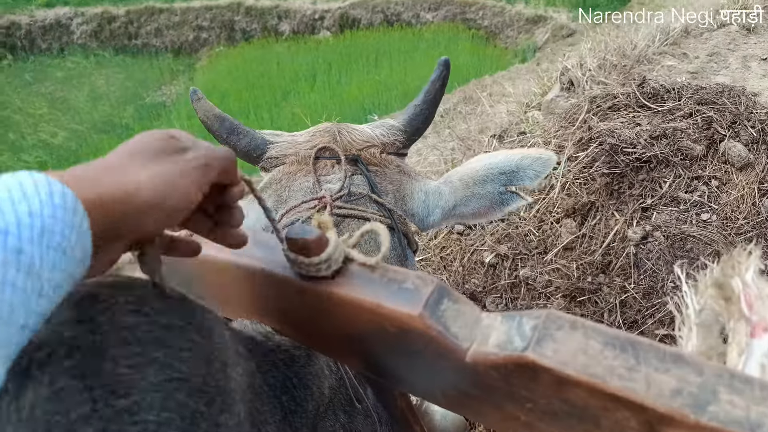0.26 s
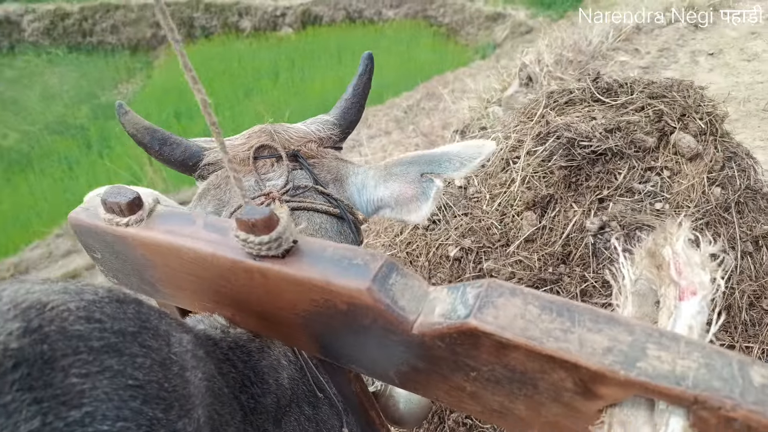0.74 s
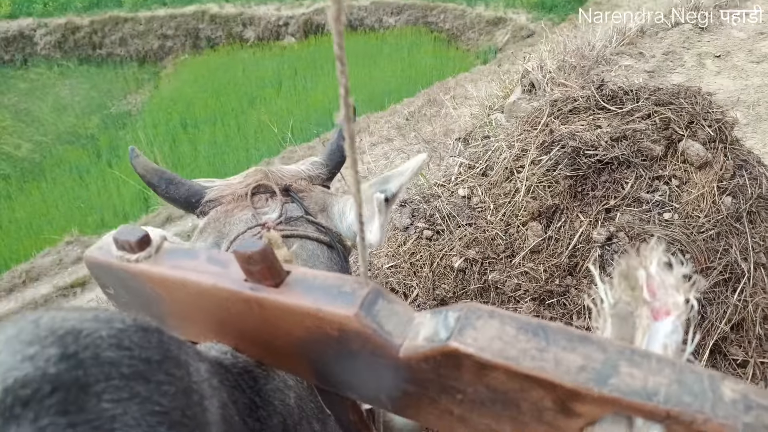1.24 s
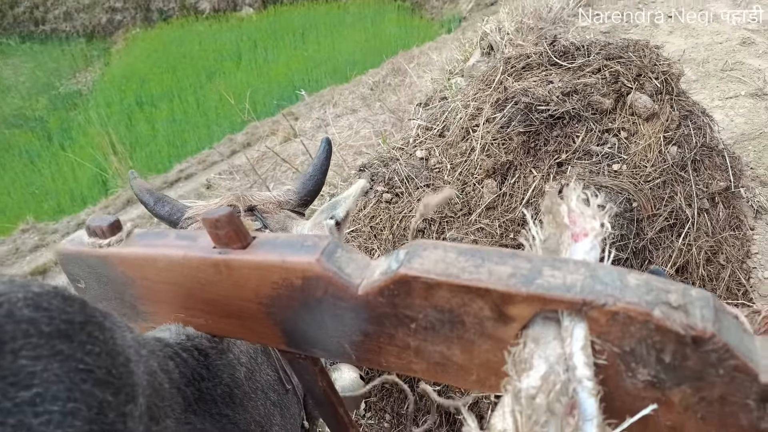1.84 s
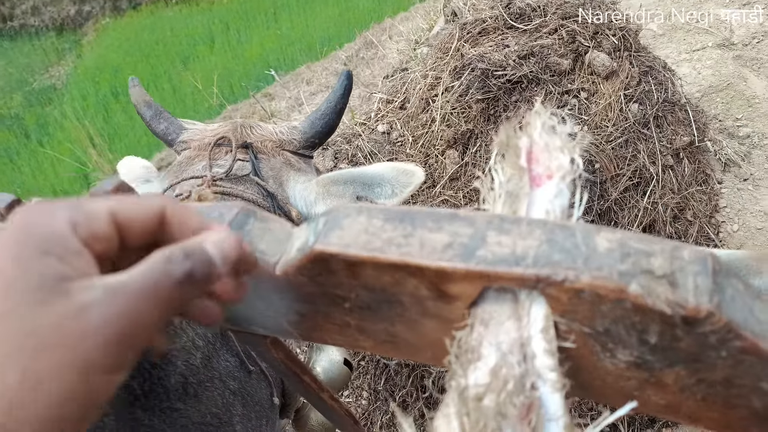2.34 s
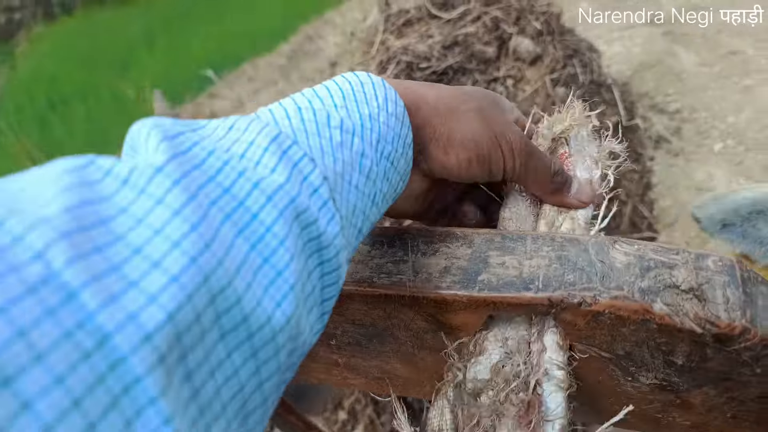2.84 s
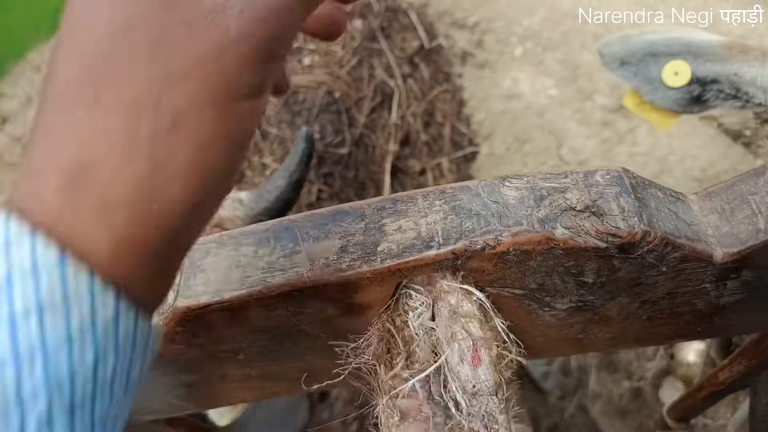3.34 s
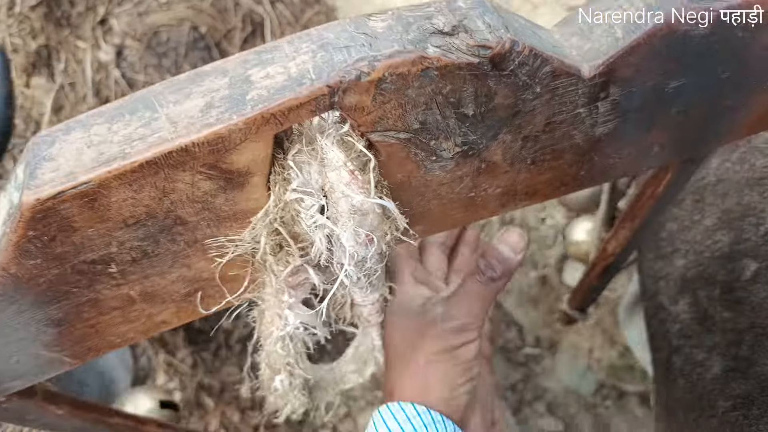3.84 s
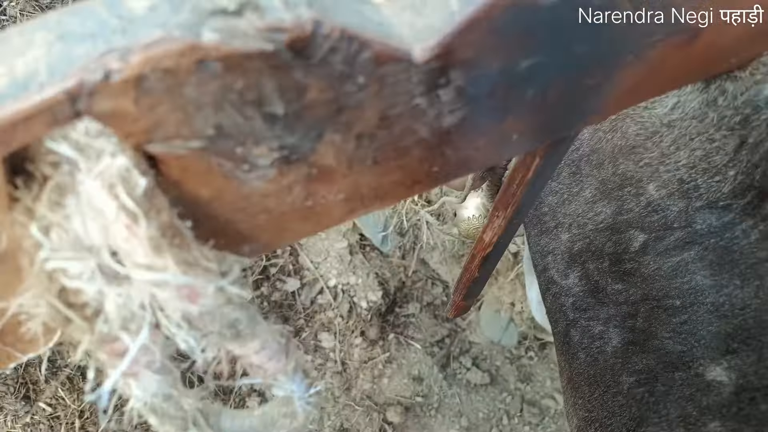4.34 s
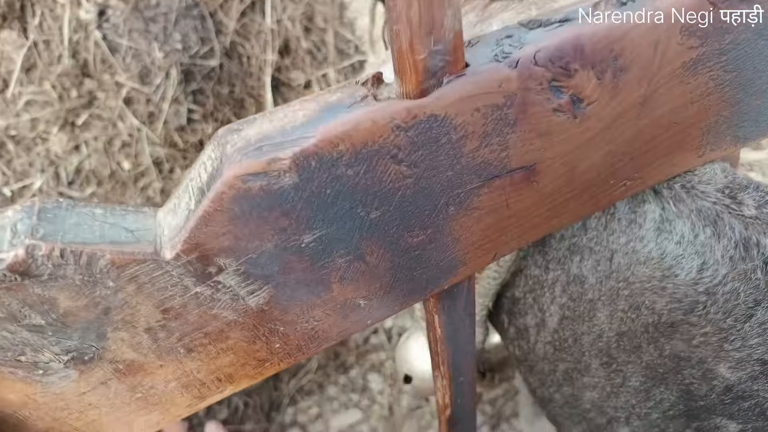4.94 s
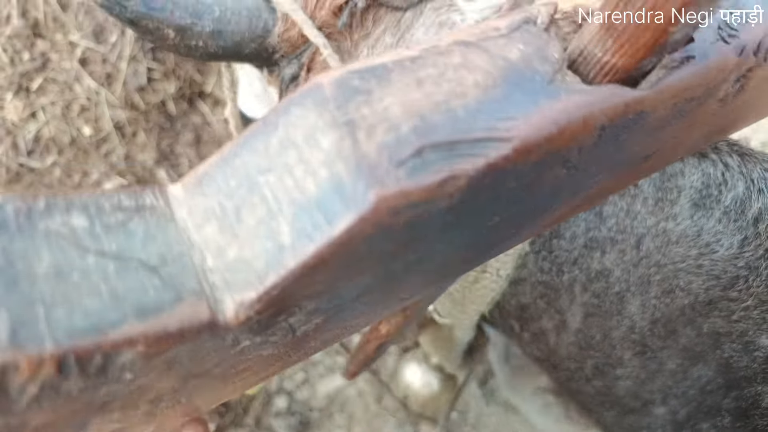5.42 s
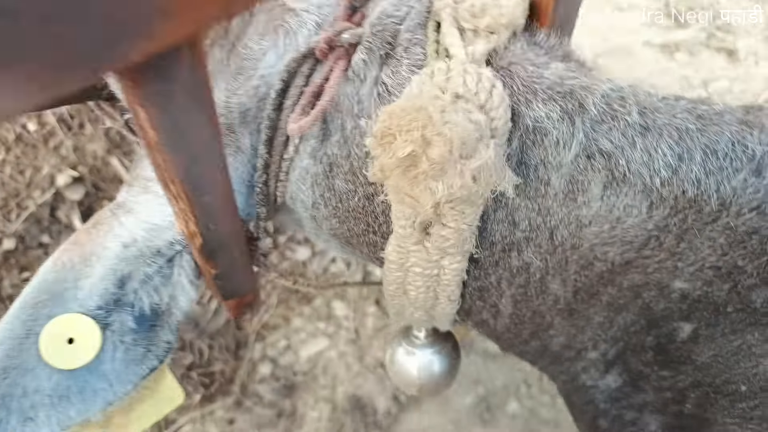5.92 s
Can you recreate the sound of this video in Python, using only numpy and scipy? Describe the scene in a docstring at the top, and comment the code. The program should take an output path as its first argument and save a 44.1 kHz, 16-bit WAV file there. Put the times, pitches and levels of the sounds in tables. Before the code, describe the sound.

Small metal neck bells clink and ring on yoked cattle as a wooden peg knocks in its beam, building to a loud jangle.

```python
"""Three open neck bells ring as their clappers land, each a sum of decaying modes excited by impulses.
Two round pellet bells clink and at last jangle: a slit's air note, shell modes and a short noise clash.
Two yoked cattle stand in a field while the yoke is worked loose close to the microphone: a peg knocks in
the beam (short wooden modes and a crack), and rope and straw rustle (grainy filtered noise).
Small gusts puff on the microphone as brief low cycles with eddies, over a faint open-air hush."""
import sys
import numpy as np
from scipy import signal
from scipy.fft import rfft, irfft, next_fast_len
from scipy.io import wavfile
from scipy.ndimage import uniform_filter1d

SR = 44100
rng = np.random.default_rng(int(sys.argv[2]) if len(sys.argv) > 2 else 0)


def pcm_store(signal):
    """Save signal as 16-bit PCM."""
    levels = np.round(np.clip(np.atleast_2d(signal), -1, 1) * 32767)
    wavfile.write(sys.argv[1], SR, levels.astype(np.int16).T)


N = 272405

# Levels in the tables are relative, before the gains and random spreads of their sources.
# open-air hush: (frequency [Hz], spectrum [dB per Hz])
FIELD_COLOUR = [(30, -5), (120, 7), (400, 4.5), (1130, -32), (4080, -7), (8080, -74), (12000, -30),
                (16000, -6)]
FIELD_DB = -80.5
# gusts on the microphone: (time [s], level [dB], pitch [Hz])
PUFFS = [(0.06, -31.5, 129), (0.18, -37, 145), (1.025, -37.5, 184), (1.186, -32, 110), (1.24, -42, 160),
         (1.373, -43, 121), (1.785, -41.5, 150), (1.859, -39.5, 103), (1.899, -43, 125.3),
         (1.969, -30.5, 132), (2.16, -57, 90), (2.798, -53, 112), (3.048, -36, 120), (4.081, -32.5, 140),
         (4.386, -42.5, 127), (4.821, -56.5, 85), (6.15, -46, 140)]
# spells of fluttering air around the puffs: (start [s], end [s], level [dB])
FLUTTER = [(1.0, 1.46, -61.5), (1.616, 1.95, -57.5), (3.003, 3.175, -62.5), (3.646, 3.95, -72.5),
           (4.146, 4.454, -61.5), (5.05, 5.15, -60.5)]
# straw, hide and cloth: (time [s], level [dB])
RUSTLE = [(0, -69), (.25, -80.5), (.47, -80), (.5, -85.5), (.98, -82.5), (1.05, -69.5), (1.6, -75.5),
          (2.0, -77), (2.5, -79), (2.9, -68.5), (3.22, -68), (3.3, -76), (3.6, -74.5), (4.1, -70.5),
          (4.38, -70.5), (4.56, -79.5), (5.1, -67.5), (6.18, -64)]
# spectrum of the rustle and of the contact noises: (frequency [Hz], spectrum [dB per Hz])
RUSTLE_COLOUR = [(60, -29.5), (250, -20), (550, -20.5), (990, -17), (1680, -23), (2130, -21), (4950, -23),
                 (6050, -24.5), (8000, -33.5), (9580, -47), (13100, -45), (15100, -37), (16000, -36)]
# a hand or strap brushes past: (time [s], level [dB])
SCUFFS = [(2.14, -67)]
# the rope drags round the peg: (time [s], level [dB])
ROPE = [(.6, -100), (.635, -65.5), (.66, -69), (.675, -53.5), (0.716, -48.5), (.75, -59.5), (.8, -66.5),
        (.86, -112)]
# spectrum of the rope: (frequency [Hz], spectrum [dB per Hz])
ROPE_COLOUR = [(40, -40), (130, -5.5), (410, -2), (700, -9.5), (1200, -11.5), (1670, -2), (2300, -10.5),
               (4100, -9), (6300, -12.5), (9000, -27), (15500, -22)]
# modes of the wooden beam: (frequency [Hz], level [dB], t60 [s])
WOOD_MODES = [(168, -30, 0.11), (478, -18, 0.072), (617, -11.5, 0.008), (804, -17.5, 0.066),
              (1008, -6.5, 0.086), (1517, -1, 0.018), (1754, -4, 0.055), (2163, -2.5, 0.029),
              (2584, 0.5, 0.018), (2970, -2.5, 0.038), (4170, -2, 0.017)]
# peg and beam knocks: (time [s], level [dB], place on the beam [0-1], hardness [dB per octave])
KNOCKS = [(1.0124, -37.5, 0.26, 3.5), (1.072, -29.5, 0.08, -9), (1.082, -40.5, 0.3, -9),
          (1.131, -39.5, 0.46, -2.5), (1.1437, -30.5, 0.39, -1.5), (1.221, -45.5, 0, -5.5),
          (1.279, -47, 0.55, -5.5), (1.848, -35, 0.52, -5), (2.962, -48, 0.26, -2),
          (3.024, -42.5, 0.35, -9.5), (4.371, -49, 0.34, -0.5), (4.581, -30, 0.58, -3),
          (5.160, -47, 0.34, -11.5), (5.368, -45.5, 0.76, -10), (5.558, -42, 0.82, -12.5)]
# air notes of the two slits: (frequency [Hz], t60 [s])
SLIT_NOTES = [(1040, 0.18), (1105, 0.17)]
# mode frequencies of the two round shells: (frequency [Hz])
SHELL_A_HZ = [2511, 3110, 4648, 4832, 5399, 5566, 6940, 7485, 10500, 15715, 2638]
SHELL_B_HZ = [2738, 2955, 4938, 5050, 5680, 6374, 7970, 11220, 14760, 15320, 5313]
# shells of the two round bells, three parallel lists: (frequency [Hz], level [dB], t60 [s])
SHELL_A = (SHELL_A_HZ, [-15.5, -11.5, -4, -7.5, -7.5, -11, -16, -17, -25.5, -19, -12.5], [0.22, 0.12, 0.17,
           0.15, 0.21, .15, 0.19, 0.2, 0.14, .2, 0.094])
SHELL_B = (SHELL_B_HZ, [-8, -13.5, -11, -4, -15.5, -12.5, -18, -27.5, -24, -24, -11], [.15, 0.12, 0.12,
           0.14, 0.17, 0.13, 0.12, 0.14, 0.15, .15, .15])
# pellet blows; low pitch = first bell, high = second:
# (time [s], level [dB], pitch [Hz], shell against air note [dB])
CLINKS = [(0.383, -50.5, 1124, -12), (1.2394, -41, 1112, -20), (1.335, -41, 1106, -9),
          (1.3869, -34.5, 1122, -18), (1.434, -39.5, 1117, -12), (1.88, -30.5, 1112, -6.5),
          (1.9634, -42, 1110, 3), (2.239, -40, 1110, -4.5), (2.2702, -33.5, 1085, -11),
          (2.35, -39, 1084, -6), (2.389, -34.5, 1060, -10), (2.416, -37, 1075, -8), (2.458, -41, 1096, -6),
          (2.605, -42, 1086, -6), (2.656, -31, 1054, -3.5), (2.7047, -33, 1120, -6.5),
          (2.727, -35, 1110, -9), (2.7824, -34, 1114, -8), (2.843, -37, 1090, -13),
          (2.862, -40.5, 1053, -7), (3.0299, -32, 1022, -23), (3.345, -44.5, 1020, -16),
          (4.4085, -37.5, 1170, -8), (4.5077, -29.5, 1084, -3), (4.6239, -29.5, 1103, -11.5),
          (4.669, -37.5, 1030, -15), (4.7565, -29.5, 1061, -8), (4.9033, -35, 1035, -21),
          (5.072, -37, 1027, -20), (5.1464, -40, 1100, -17), (5.2024, -20.5, 1112, -9),
          (5.24, -34, 1150, 5), (5.297, -27.5, 1042, -8.5), (5.322, -32.5, 1050, -12),
          (5.3607, -27.5, 1035, -12.5), (5.392, -33.5, 1030, -3.5), (5.5148, -27.5, 1055, -10),
          (5.6154, -23.5, 1107, -29.5), (5.706, -28, 1128, -23), (5.72, -25.5, 1036, -24),
          (5.7617, -21.5, 1076, -2.5), (5.7872, -19, 1045, -20), (5.8192, -19.5, 1037, -20),
          (5.865, -30, 1035, 2), (5.9, -20.5, 1095, -15), (5.936, -12.5, 1118, -13.5),
          (5.9715, -6.5, 1120, -6), (5.985, -9.5, 1100, -8.5), (6.041, -16.5, 1104, 0.5),
          (6.085, -14, 1037, 2), (6.092, -3.5, 1107, -18), (6.104, -9, 1110, -8.5), (6.122, -7, 1133, -10),
          (6.147, -11.5, 1033, -5)]
# pellets rolling and bouncing while the necks swing: (time [s], level [dB])
JANGLE = [(1.82, -90), (1.835, -62.5), (1.885, -62.5), (1.91, -93), (4.4, -92), (4.75, -76), (5.68, -60),
          (5.8, -46), (6.03, -37), (6.18, -42)]
# mode frequencies of the three open bells: (frequency [Hz])
LOW_HZ = [802, 2048, 3771, 3701, 5420, 5845, 6733, 6453, 8435, 6650, 6519, 5380, 10780, 799, 15097, 15697]
THIN_HZ = [6737, 3630, 4660, 2057, 6062, 5595, 6277, 7960, 6358, 4885, 4770, 10120, 11070, 14340, 10720,
           5009]
CLEAR_HZ = [2044, 4322, 804, 5688, 6762, 6054, 7580, 5962, 10145, 4302, 7693, 14750, 15510, 3665]
# open bells, three parallel lists: (frequency [Hz], level [dB], t60 [s]);
# neighbouring modes swing along two different axes of the bell
LOW_BELL = (LOW_HZ, [-10, -9.5, -6.5, -12.5, -4.5, -6, -12.5, 0.5, -14, -9, -7, -11, -23, -12, -15, -20],
            [1.68, 1.23, 1.14, 1.6, 0.72, .45, 1.08, 0.25, 0.42, .5, 0.29, 0.54, 0.24, 1.66, 0.24, .2])
THIN_BELL = (THIN_HZ, [-21, -8.5, -11, -15, 2, -13, -5, -7.5, -5.5, -2.5, -14, -14.5, -18.5, -5, -23, -6],
             [0.9, 0.36, .1, 0.85, 0.12, 0.28, 0.31, 0.21, 0.14, 0.17, 0.1, 0.19, 0.11, 0.17, 0.12, 0.13])
CLEAR_BELL = (CLEAR_HZ, [-15.5, -8, -18, -9, -10, -3, -14, -8, -13, -9, -5.5, -15, -13, -13], [.9, 1.24,
              1.27, 0.33, 0.81, 0.32, 0.29, 0.4, 0.23, 0.96, 0.29, .25, .2, 0.28])
# clapper blows: (bell [name], time [s], level [dB], place on the rim [0-1])
BLOWS = [("low", 1.1338, -45.5, 0.3), ("low", 1.4341, -46, 0.9), ("low", 1.562, -57, 0.6),
         ("low", 3.076, -51, 0.8), ("thin", 1.827, -42.5, 0.32), ("low", 1.8322, -48, 0.58),
         ("low", 1.8547, -49, 0.53), ("thin", 2.234, -41, 0.22), ("thin", 2.2503, -42, 0.48),
         ("low", 2.6, -41.5, 0.34), ("thin", 2.6684, -34.5, 0.67), ("thin", 3.0751, -42, 0.4),
         ("thin", 3.395, -31, 0.27), ("thin", 3.5538, -52, 0.3), ("thin", 4.579, -39.5, 0.36),
         ("clear", 4.702, -33.5, 0.47), ("clear", 4.7364, -31.5, 0.78), ("clear", 4.7671, -30.5, 0.53),
         ("clear", 4.7988, -35.5, 0.33), ("low", 4.9397, -41, 0.24), ("thin", 4.937, -29, 0.28),
         ("clear", 4.9768, -27, 0.2), ("low", 5.228, -36.5, 0.31), ("low", 5.3393, -39, 0.54),
         ("thin", 5.5094, -41, 0.11), ("low", 5.7144, -34, 0.7), ("low", 5.8386, -30, 1),
         ("low", 5.8624, -28.5, 0.65), ("clear", 5.9723, -31.5, 0.17), ("thin", 5.9974, -18.5, 0.4),
         ("clear", 5.999, -22, 0.85)]

SCUFF_RISE_S, SCUFF_FADE_S = 0.0093, 0.049
SWING_S, SWING_DB = 0.06, 3.5  # a swinging bell turns its modes to and from the microphone
# faint stray clinks fall at random within these times and pitches
STRAY_S, STRAY_HZ = (1.0, 5.7), (992, 1170)
STRAY_DB, STRAY_SPREAD_DB, STRAY_SHELL_DB = -55, 3.5, -12
TOP_HZ = 15900
STIR = 1e-15 * np.cos(np.arange(N))  # keeps dying modes from reaching zero


def undb(db):
    """Logarithmic level: 20 dB is a factor of ten in amplitude."""
    return 10 ** (np.asarray(db) / 20)


def curve(rows):
    """Linear interpolation: a (time, value) table joined by straight lines."""
    return np.interp(np.arange(N) / SR, *np.transpose(rows))


def walk(hold_s):
    """Smoothed random process: normal values held for hold_s and slewed."""
    hold = int(hold_s * SR)
    steps = np.repeat(rng.standard_normal(N // hold + 1), hold)
    return uniform_filter1d(steps, hold)[:N]


def butter(sound, hz, kind="low"):
    """Second-order Butterworth filtering: a maximally flat passband."""
    return signal.sosfilt(signal.butter(2, hz, kind, fs=SR, output="sos"), sound)


def coloured(points, lo_hz, hi_hz):
    """Spectral shaping: two unrelated noises of one spectrum, rms 1 between lo_hz and hi_hz."""
    size = next_fast_len(N, True)
    f = np.maximum(np.fft.rfftfreq(size, 1 / SR), 1)
    point_hz, point_db = np.transpose(points)
    gain = undb(np.interp(np.log(f), np.log(point_hz), point_db))
    band = (f > lo_hz) & (f < hi_hz)
    gain = gain / np.sqrt(np.sum(gain[band] ** 2) / len(f))
    return irfft(rfft(rng.standard_normal((2, size))) * gain, size)[:, :N]


def ports(hz):
    """Directional level difference: low modes nearly alike in both ports, higher ones leaning right."""
    lean = np.clip(hz / 7000, .2, 1) * (1 - .6 * (hz > 10000))  # less above 10 kHz
    spread_db = (2.5 + 3 * (hz > 6500)) * rng.standard_normal() * (hz > 1500)
    pan_db = lean * (-1.5 + spread_db)
    return undb([[pan_db / 2], [-pan_db / 2]])


def ring(force, hz, t60, rise_s=0.00089):
    """Damped resonance: a unit tick swings up with time constant rise_s, then fades 60 dB in t60."""
    w = 2 * np.pi * hz / SR
    slow, quick = np.exp(-np.log(1000) / (t60 * SR)), np.exp(-1 / (rise_s * SR))
    fade = [.5, 0, -.5, 1, -2 * slow * np.cos(w), slow ** 2]
    rise = [1 - quick, 0, quick - 1, 1, -2 * quick * np.cos(w), quick ** 2]
    out, first = np.zeros(N), np.argmax(force != 0)
    out[first:] = signal.sosfilt([fade, rise], (force + STIR)[first:])
    return out


def ticks(times, gains, bounce_s, count=3):
    """Repeated impact: each blow is a tick and a few weaker rebounds within bounce_s."""
    late = rng.random((len(times), count)) * bounce_s * SR
    late[:, 0] = 0
    at = (np.asarray(times)[:, None] * SR + late).astype(int).clip(0, N - 1)
    force = np.zeros(N)
    np.add.at(force, at, np.asarray(gains)[:, None] * 0.7 ** np.arange(count))
    return force


def burst(s, db, fade_s, bounce_s, low_hz=1620.0):
    """High modal density: modes too dense to tell apart become a bright noise that dies fast."""
    fade = signal.lfilter([1], [1, -np.exp(-1 / (fade_s * SR))], ticks(s, undb(db), bounce_s))
    return butter(fade * coloured(RUSTLE_COLOUR, 720, 12000)[0], low_hz, "high")


def struck(modes, blows, bounce_s, scatter_db, centre_hz, rise_s, swing_db=0):
    """Modal excitation: the place shares a blow between two axes, the hardness tilts the modes."""
    s, db, place, *hard_db = np.transpose(blows)
    angle = np.pi / 2 * place.clip(0, 1)
    axes = np.cos(angle), np.sin(angle)
    out, swing = np.zeros((2, N)), undb(swing_db * walk(SWING_S))
    for k, (hz, mode_db, t60) in enumerate(modes):
        tilt_db = sum(hard_db) * np.log2(hz / centre_hz) + scatter_db * rng.standard_normal(len(s))
        heard = ports(hz) * np.roll(swing, rng.integers(N))
        force = ticks(s, axes[k % 2] * undb(db + mode_db + tilt_db), bounce_s)
        out += heard * ring(force, hz, t60, rise_s)
    return out


def field_hush():
    """Stationary noise: a steady open-air hush, alike in both ports."""
    return undb(FIELD_DB) * coloured(FIELD_COLOUR, 30, 12000)[0]


def gusts(turns=0.82, eddy_db=-13.0):
    """Pressure on a diaphragm: puffs drive a cycle or two with small eddies, alike in both ports."""
    out, t = np.zeros(N), np.arange(N) / SR
    eddy_colour = [(40, -4), (100, 13.0), (300, 3.5), (1100, -40), (4000, -80)]  # (Hz, dB per Hz)
    eddies = undb(eddy_db) * coloured(eddy_colour, 40, 850)[0]
    for (s, db, hz), phase in zip(PUFFS, rng.random(len(PUFFS))):
        near = slice(max(int((s - .08) * SR), 0), int((s + .08) * SR))
        cycles = (t[near] - s) * hz
        wave = np.exp(-(cycles / turns) ** 2) * np.cos(2 * np.pi * (cycles + phase))
        out[near] += undb(db) * (wave + np.exp(-np.abs(cycles) / (2.36 * turns)) * eddies[near])
    rumble_colour = [(30, -17), (70, -3.5), (120, 1), (200, -13.0), (400, -41), (1500, -90)]
    rumble = coloured(rumble_colour, 30, 400)[0] * undb(4.9 * walk(.025))
    for start, end, db in FLUTTER:
        swell = np.sin(np.pi * ((t - start) / (end - start)).clip(0, 1))
        out += undb(db) * swell * rumble
    return out


def rustle(gain, colour, lo_hz, hi_hz, grain_db, grain_s, patchy_db=4.0, drift_db=2.5):
    """Stick-slip friction: fibres slip in uneven grains, nearly the same in both ports."""
    mid, side = coloured(colour, lo_hz, hi_hz)
    patches = 0
    for edge_hz in (300, 600, 1200, 2500):  # each band from the bass up swells in its own patches
        dull = butter(mid, edge_hz)
        patches = patches + undb(patchy_db * walk(.04)) * dull
        mid = mid - dull
    mid = undb(drift_db * walk(.11)) * mid + patches
    side = undb(-20) * butter(side, 2500, "high")
    return gain * undb(grain_db * walk(grain_s)) * (mid + side * np.array([[1], [-1]]))


def scuffs():
    """Exponential envelope: each brush swells quickly and fades slowly."""
    t = np.arange(N) / SR
    return sum(undb(db) * np.exp(np.minimum((t - s) / SCUFF_RISE_S, (s - t) / SCUFF_FADE_S))
               for s, db in SCUFFS)


def straw():
    """Dry friction: straw, hide and cloth rustle, louder where a hand or strap brushes past."""
    return rustle(undb(curve(RUSTLE)) + scuffs(), RUSTLE_COLOUR, 1004, 2490, 2.5, 0.018)


def rope():
    """Sliding friction: the rope drags round the peg in short, fine grains."""
    return rustle(undb(curve(ROPE)), ROPE_COLOUR, 100, 16000, 3.2, 0.004, 2.0, 0)


def wood(crack_db=-3.5):
    """Impact on a beam: short modes, and a broad crack of the contact itself."""
    s, db, _, hard_db = np.transpose(KNOCKS)

    def crack(on):
        """Contact noise: a harder blow cracks louder."""
        return burst(s[on], (db + 2.1 * hard_db + crack_db)[on], 0.0037, 0.0027, 360.0)

    soft = hard_db < -5
    dull = 2 * butter(crack(soft), 3800)  # a soft contact cracks with little treble
    return struck(WOOD_MODES, KNOCKS, 0.003955, 1.0, 1230.0, 0.00037) + crack(~soft) + dull


def clinks(count=95):
    """Random arrivals: the listed pellet blows joined by faint stray ones, as columns."""
    when, pitch, size, tone = rng.random((count, 4)).T
    stray_db = STRAY_DB + STRAY_SPREAD_DB * np.log(size / (1 - size)) / 2
    stray = [np.interp(when, (0, 1), STRAY_S), stray_db,
             np.interp(pitch, (0, 1), STRAY_HZ), STRAY_SHELL_DB + 12 * (tone - .5)]
    return np.hstack([np.transpose(CLINKS), stray])


def spots(force, spread_db):
    """Modal participation: every bounce lands on another spot and wakes a mode more or less."""
    out, at = np.zeros(N), np.flatnonzero(force)
    out[at] = force[at] * undb(spread_db * rng.standard_normal(len(at)))
    return out


def loose_pellets(slit, shell, sides, rise_s, bounce_rate=260, size_db=5.5, spot_db=5.0,
                  clatter_db=-18.0, shell_db=-2.0):
    """Random impacts: about bounce_rate bounces per second drive the air, shell and clatter."""
    loose = (rng.random(N) < bounce_rate / SR) * undb(curve(JANGLE) + size_db * rng.standard_normal(N))
    loose[:int(JANGLE[0][0] * SR)] = 0
    hits = np.flatnonzero(loose)
    clatter = burst(hits / SR, 20 * np.log10(loose[hits]) + clatter_db, 0.0073, 0, 2200.0)
    air = ports(slit[0]) * ring(loose, *slit, rise_s)
    modes = [undb(db + shell_db) * ring(spots(loose, spot_db), hz, t60) for hz, db, t60 in zip(*shell)]
    return clatter + air + sides @ modes


def round_bells(clash_db=-19.5, rise_s=0.0032, glide=0.116, free_db=-5.0, muted=0.26):
    """Cavity and shell resonance: pellets wake a short air note at the slit and a brighter shell."""
    s, db, hz, rel_db = clinks()
    second = ((hz - 1045) / 60).clip(.05, .95)  # the second bell's share of the blow
    # a slit that turns against the hide bends its note away from the other bell's
    notes = np.minimum(hz, SLIT_NOTES[0][0]), np.maximum(hz, SLIT_NOTES[1][0])
    # soft blows come from a bell that rests on the hide and dies early; hard ones swing it free
    lasts = np.clip(1 + (1 - muted) * (db - free_db) / 30, muted, 1)
    out = burst(s, db + rel_db + clash_db, 0.012, 0.027) * np.ones((2, 1))
    longest = np.arange(SR // 4) / SR
    spans = [longest[:int(len(longest) * last)] for last in lasts]
    starts = (s * SR).astype(int)
    bells = zip((1 - second, second), notes, SLIT_NOTES, (SHELL_A, SHELL_B))
    for share, note, slit, shell in bells:
        air_hz, air_t60 = slit
        mode_hz, mode_db, t60 = np.array(shell)[:, :, None]
        sides = np.hstack([ports(f) for f in shell[0]])
        out += loose_pellets(slit, shell, sides, rise_s)
        chance = rng.standard_normal((len(s), 3, len(mode_hz), 1))
        turn = undb(rng.standard_normal((len(s), 1, 1)) * [[.8], [-.8]])  # the slit faces either port
        bends = glide * rng.standard_normal(len(s))  # the turning slit slides its note by 2 * bend per s
        for k, (at, t) in enumerate(zip(starts, spans)):
            air = (1 - np.exp(-t / rise_s)) ** 2 * undb(db[k] - 60 * t / air_t60 / lasts[k])
            air = air * np.sin(2 * np.pi * note[k] * t * (1 + bends[k] * t))
            size, detune, late = chance[k]
            age = np.maximum(t - .004 * np.abs(late), 0)  # the pellet skids, waking modes one by one
            level_db = db[k] + rel_db[k] + mode_db + 5.06 * size.clip(-1, 1)
            modes = undb(level_db - 60 * age / t60 / lasts[k]) * (1 - np.exp(-age / 0.002))
            modes = modes * np.sin(2 * np.pi * mode_hz * (1 + 0.0025 * detune) * age)
            clink = ports(air_hz) * turn[k] * np.sqrt(share[k]) * air + share[k] * sides @ modes
            out[:, at:at + len(t)] += clink[:, :N - at]
    return out


def open_bells(gain_db=-8.0, clash_db=-18.0, low_hard_db=1.18):
    """Modal vibration of shells: clappers land on three thin cast bells that swing as they ring."""
    def on(bell, *hard_db):
        """Selection of excitation: the blows on one bell, with any hardness in dB per octave."""
        return [blow[1:] + hard_db for blow in BLOWS if blow[0] == bell]

    low = struck(zip(*LOW_BELL), on("low", low_hard_db), 0.0065, 1.64, 8800.0, 0.00033, SWING_DB)
    thin = struck(zip(*THIN_BELL), on("thin"), .008, 1.0, 6000., 0.00039, SWING_DB)
    clear = struck(zip(*CLEAR_BELL), on("clear"), .008, 1.5, 5500., .0006, SWING_DB)
    s, db = np.transpose([blow[1:3] for blow in BLOWS])
    clash = burst(s, db + clash_db, 0.0067, .02)
    return undb(gain_db) * (low + thin + clear) + clash


def scene():
    """Superposition in a free field: everything is close and in the open, with no echo."""
    background = field_hush() + gusts()
    handling = straw() + rope() + wood()
    return background + handling + round_bells() + open_bells()


def record(dry, bass_cut_hz=56.0):
    """Band limiting: the microphone's chain thins the deepest bass and cuts the top."""
    thin = butter(dry, bass_cut_hz, "high")
    return signal.sosfilt(signal.ellip(10, .2, 80, TOP_HZ, fs=SR, output="sos"), thin)


dry = scene()
out = record(dry)
pcm_store(out)
```